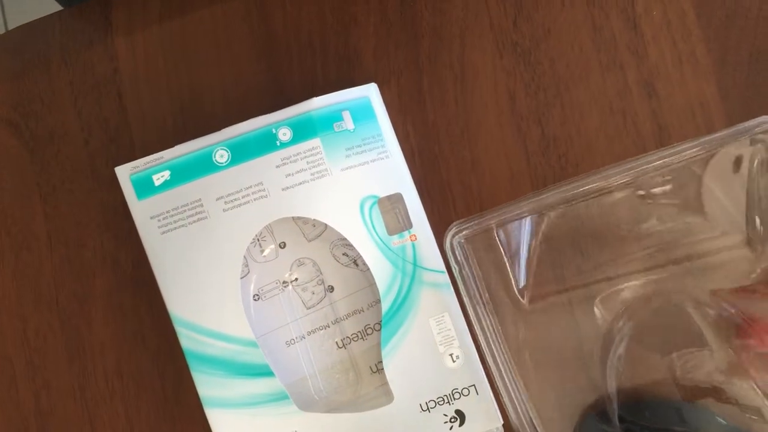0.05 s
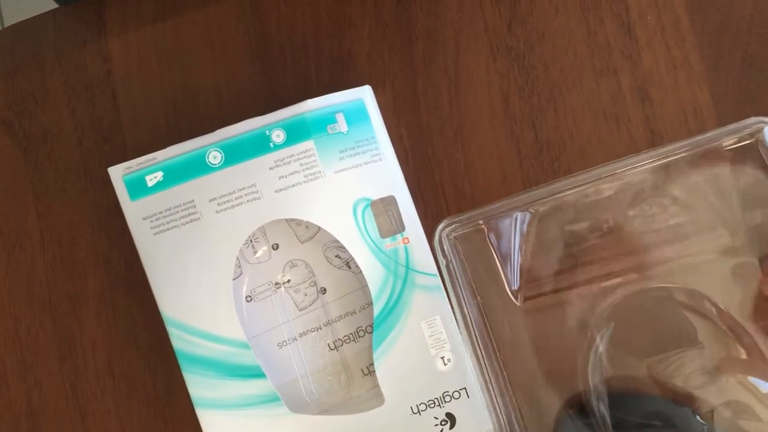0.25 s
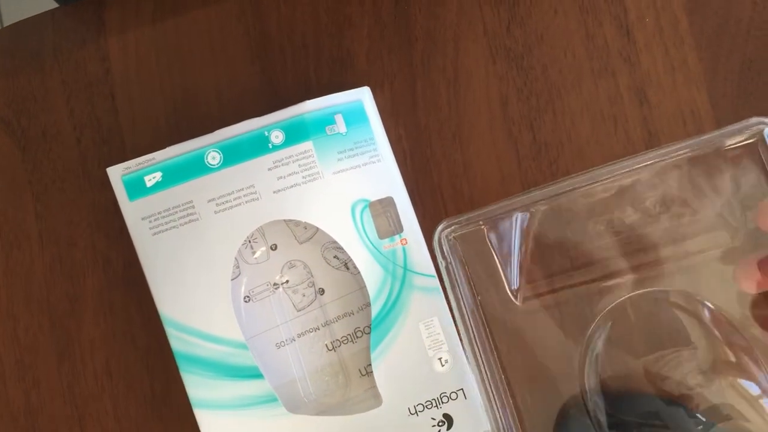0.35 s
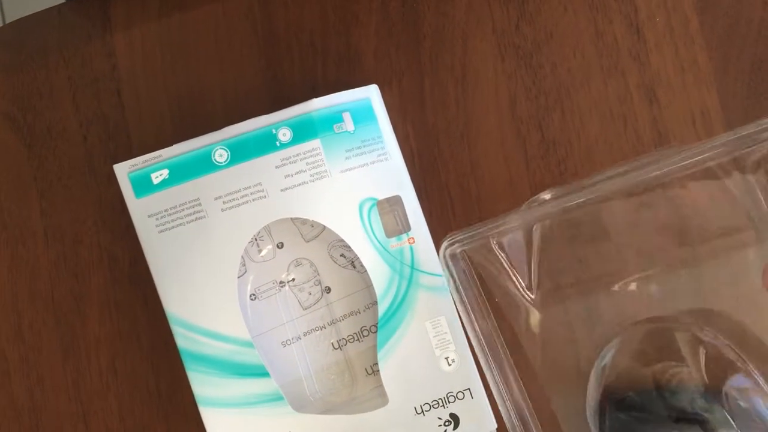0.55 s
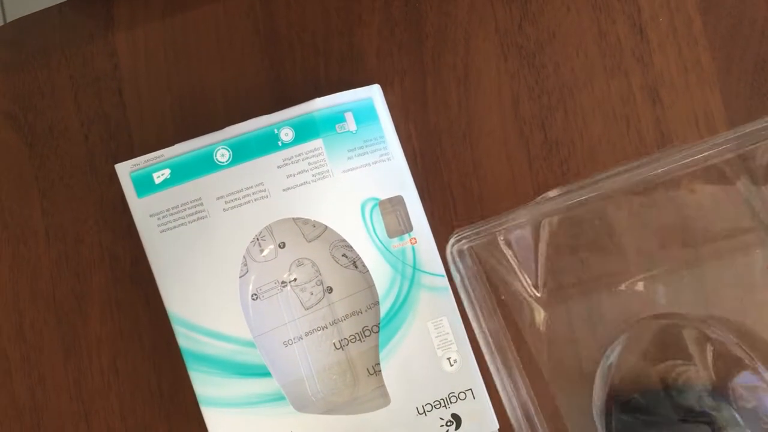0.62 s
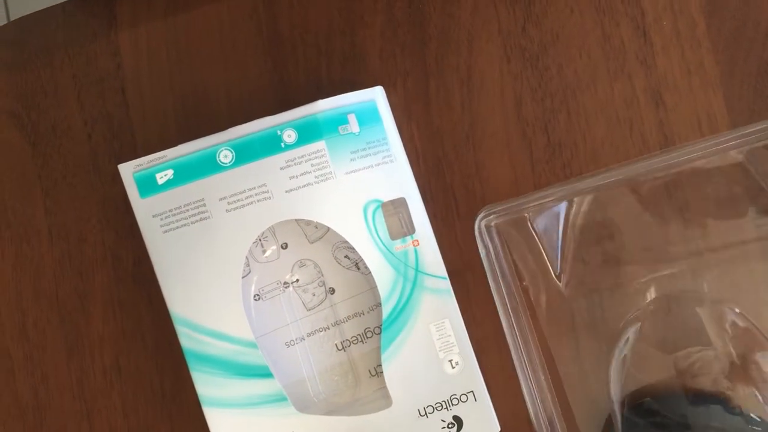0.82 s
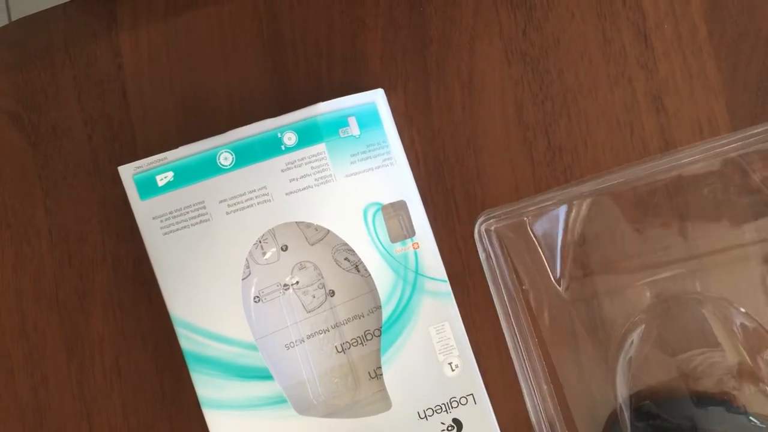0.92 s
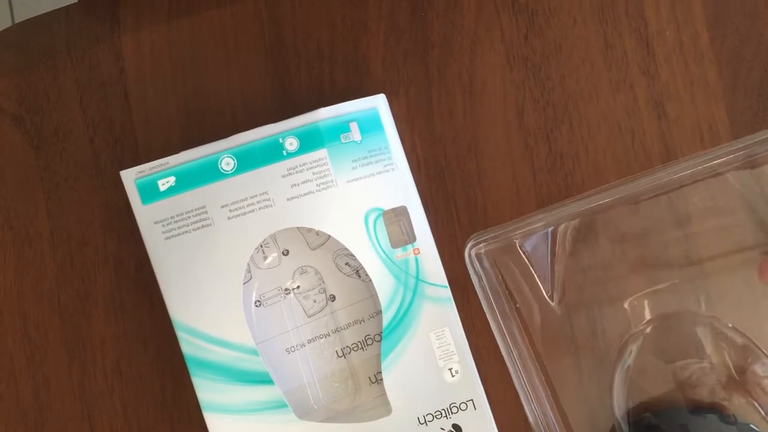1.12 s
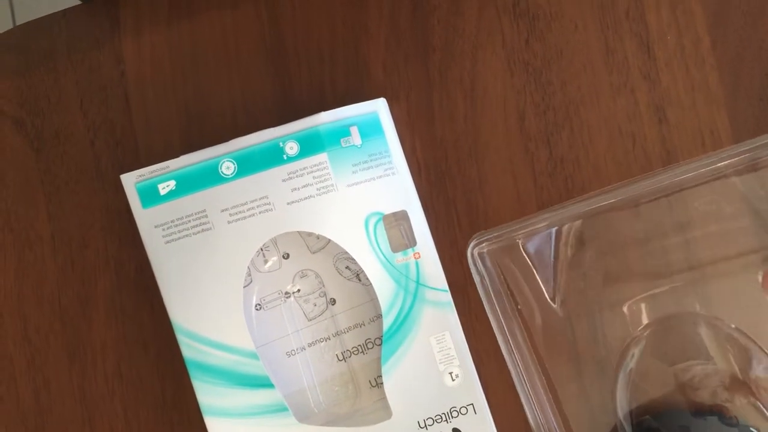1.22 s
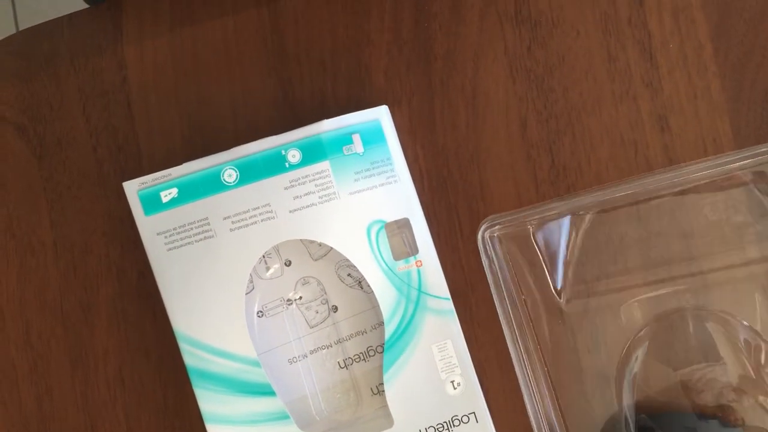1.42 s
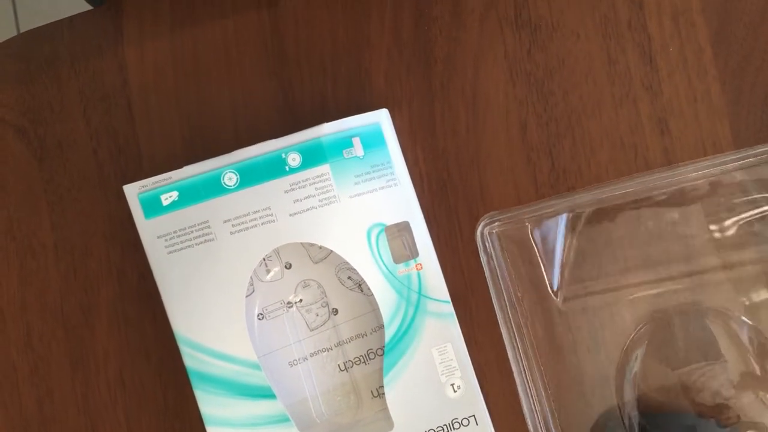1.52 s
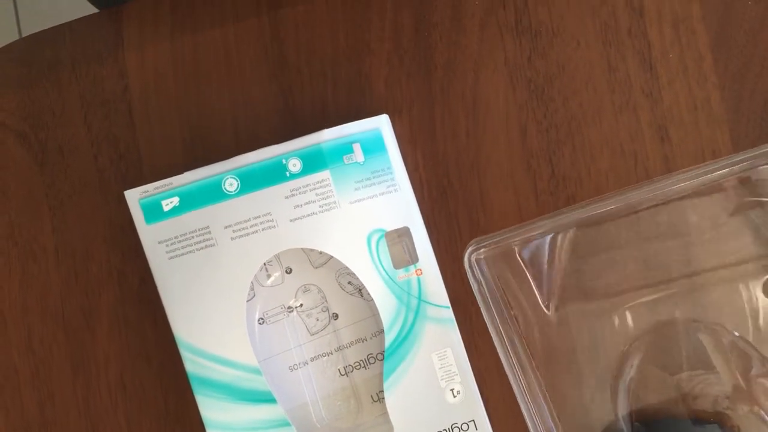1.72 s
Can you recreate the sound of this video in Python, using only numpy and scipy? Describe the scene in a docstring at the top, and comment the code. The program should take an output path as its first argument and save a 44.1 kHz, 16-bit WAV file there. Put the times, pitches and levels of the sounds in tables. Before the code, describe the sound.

Hard clear plastic packaging snaps and clacks loudly on a wooden table in a quiet room

```python
"""Sharp snaps of a clear plastic blister tray lifted and shifted on a wooden table in a small room.
Snaps: decaying noise bands, coloured by the buckling spot. Rim scrapes: dense random impulses.
Both pass through the shell resonances. Panel knocks and table bumps: damped sine modes.
Rim squeaks: narrow-band noise. Decaying-noise reverberation and a steady room tone lie behind."""
import sys
import numpy as np
from scipy import signal
from scipy.fft import rfft, irfft, next_fast_len
from scipy.io import wavfile

SR = 44100
rng = np.random.default_rng(int(sys.argv[2]) if len(sys.argv) > 2 else 0)


def output_pcm(signal):
    """Save a mono or channel-first signal as 16-bit PCM at the path in sys.argv[1].

    Samples are clipped to [-1, 1] before scaling.
    """
    pcm = np.clip(np.atleast_2d(signal).T, -1, 1) * 32767
    wavfile.write(sys.argv[1], SR, np.round(pcm).astype(np.int16))


N = 77175
T = np.arange(SR * 3 // 4) / SR  # time axis of one event, s
SIZE = next_fast_len(N + SR) // 2 * 2
HZ = np.fft.rfftfreq(SIZE, 1 / SR)

# Room tone spectrum, relative: freq_hz, level_db
ROOM_TONE_SPECTRUM = [(20, -38), (60, -4.5), (100, -4.5), (170, 3.5), (300, -15), (700, -6), (1200, -18.5),
                      (3000, -18.5), (6000, -27.5), (15000, -35.5)]
ROOM_TONE_DB = -64
# Reverberation decay: freq_hz, t60_s
ROOM_DECAY = [(100, 0.67), (170, 1), (350, 0.53), (700, 0.36), (2000, 0.39), (3500, 0.36), (6000, 0.27),
              (15000, 0.32)]
ROOM_DB, ROOM_RISE_S = -12.5, 0.0013

# Tabletop thuds: start_s, level_db, pitch_hz
BUMPS = [(0.229, -35, 168), (0.279, -36.5, 127.4), (0.333, -36, 66.6), (.365, -63, 54), (.522, -42, 74.6),
         (.815, -43, 65), (.876, -37.5, 97.4), (0.947, -44.5, 142.8), (1.13, -38.5, 123.3),
         (1.162, -37, 73), (1.554, -53, 63)]
# Tabletop modes: pitch_ratio, level_db
TABLE_MODES = [(.62, -20), (1, 0.5), (1.45, -6), (2.1, -5.5), (3.2, -19)]
BUMP_T60_S, BUMP_RISE_S = 0.17, 0.0079

# Panel knocks on the table: start_s, level_db, pitch_hz, t60_s
KNOCKS = [(.2245, -20.5, 682, 0.071), (.3362, -27, 717, 0.062), (0.3403, -22.5, 636, 0.041),
          (.6645, -14, 696, 0.021), (0.6662, -27.5, 362, 0.056), (.6810, -27, 720, 0.049),
          (.7060, -25, 667, 0.018), (0.8001, -34, 465, 0.068), (0.8765, -34.5, 374, 0.051),
          (.9160, -41.5, 631.5, 0.11), (1.0290, -45.5, 660, 0.068), (1.1301, -30.5, 534.7, 0.089),
          (1.5034, -44.5, 699, 0.12), (1.6080, -47.5, 648, 0.07), (1.6460, -42.5, 714, 0.093),
          (1.662, -44.5, 487, 0.061)]
# Panel modes: pitch_ratio, level_db
PANEL_MODES = [(0.519, -9.5), (0.758, -8.5), (1, 5.5), (1.229, -5), (1.75, -18.5)]
KNOCK_RISE_S = 0.0013
MODE_DETUNE = 0.0067  # standard deviation, fraction of pitch

# Rim squeaks: start_s, length_s, pitch_hz, level_db
SQUEAKS = [(0.069, .028, 1340, -43), (0.262, .03, 1636, -36.5), (.295, .05, 1613, -41.5)]
SQUEAK_HALF_WIDTH_HZ = 70

# Rim strokes: start_s, length_s, level_db, fade_db (drop over the stroke), treble_db
SCRAPES = [(0, 0.057, -34.5, 8.5, 0.5), (0.041, 0.18, -45, 16, -6), (0.238, 0.14, -42, 7.5, 4),
           (0.344, 0.21, -45, 15, -10.5), (0.517, 0.023, -59.5, 4, 11.5), (0.571, 0.065, -59, -4.5, 6.5),
           (.60, 0.066, -54, 6.5, 6), (0.675, 0.068, -54.5, -2, -0.5), (0.892, 0.061, -51, -1.5, 1.5),
           (0.954, 0.084, -59.5, -2.5, -16), (1.173, 0.043, -41, 12.5, 0.5), (1.39, 0.13, -59.5, 12, 14),
           (1.505, 0.11, -55, 9, 8), (1.592, 0.076, -51.5, 8, -26), (1.68, .07, -70.5, -2, 3)]
# Scrape spectrum, relative: freq_hz, level_db
SCRAPE_SPECTRUM = [(100, -2.5), (300, -4.5), (800, 1.5), (1400, -4), (2100, -5.5), (3500, -13),
                   (4800, -19.5), (7000, -26), (10000, -33), (15000, -34.5)]
SLIPS_PER_S, SLIP_SPREAD_DB, SCRAPE_EDGE_S = 3900, 1, 0.0013

# Tray shell resonances: freq_hz, width_hz, lift_db (before SHELL_TRIM_DB)
SHELL_RESONANCES = [(272, 120, -1.5), (532.8, 27.7, 11), (700.4, 65, 1.5), (802, 12, 10), (892, 19, 6),
                    (1027, 22, 5.5), (1187, 56, 2.5), (1550, 35, 7.5), (1664, 30, 6), (2003, 35, 3.5),
                    (2470, 54, 5.5), (2680, 20, -4), (3060, 17, 0.5), (3490, 93, 3.5)]
SHELL_TRIM_DB = -1.0

# Buckling snaps: start_s, level_db (before spot and shelves), bass_db, treble_db, t60_factor,
# spot_hz, spot_db (resonance of the buckling spot)
SNAPS = [(0.1998, -46.5, 10.5, 7, 2.2, 980, -4), (0.2148, -13.5, 0.5, 2, 0.81, 2750, 7.5),
         (.2172, -22, -1, 3, 1.1, 5400, 13.5), (.2215, -21.5, 4, 14.5, 0.36, 1190, 19),
         (.2245, -15, 5, 4, 0.82, 5400, 6), (.2268, -20, -1, -20, 0.77, 1320, 19),
         (.2314, -24.5, -13, 11.5, 0.5, 5740, 10.5), (.2450, -33.5, 17, 10, 1.3, 1500, -11),
         (0.2715, -39.5, -16, 15, 1.3, 14500, 15), (.4685, -45, -6, 10.5, 0.54, 3200, 11),
         (.6185, -43.5, 13.5, -6, 0.5, 2503, 8), (.6641, -23.5, 6.5, 2.5, 0.44, 6640, 16),
         (0.6651, -26.5, 4.5, -1, 0.82, 3360, 4.5), (.7982, -37.5, -13.5, 6.5, 1.6, 960, 17),
         (.8280, -53.5, 19, 4, 1.96, 3120, 10.5), (.8758, -50.5, 27.5, 1, 2.1, 860, -12),
         (.9115, -40.5, -6.5, 14.5, 0.72, 3600, 13), (.9150, -45.5, 13, -21, 2.7, 2780, 7),
         (.9365, -43.5, 7, -2, 0.44, 3710, 9), (.9420, -51.5, -8, -18, 0.62, 2750, 25),
         (.9475, -47, 2, -16, 0.56, 3600, 11), (.9890, -51, 5, -7, 0.73, 3780, 13),
         (1.0205, -65.5, -6.5, 13.5, 1.4, 2560, 18), (1.1290, -49.5, -1, 3.5, 0.91, 1763, 8),
         (1.1620, -45.5, 17.5, -6, 2.5, 2980, 11), (1.1726, -40.5, 4.5, -7, 1.12, 1065, 8.5),
         (1.1785, -41, -0.5, 9, 0.95, 4260, 4.5), (1.1870, -44.5, -3, 2, 1.6, 2850, -1),
         (1.3810, -54.5, 1, 10.5, 1.15, 2600, 11.5), (1.5026, -42.5, -29, 4, 0.31, 3485, 18),
         (1.5215, -49, -2.5, -22, 1.1, 3100, 14), (1.5557, -53.5, 14.5, 2, 0.45, 2480, 15.5),
         (1.5948, -40.5, -8, 9.5, .9, 2330, 7), (1.5975, -34.5, 0, 0.5, 0.62, 1820, 8)]
# Snap spectrum, relative: freq_hz, level_db
SNAP_SPECTRUM = [(40, -51), (100, -32.5), (170, -12), (270, -2.5), (420, -12.5), (700, 0.5), (1400, -2.5),
                 (2000, -5.5), (3000, -6), (4300, -12), (5600, -14.5), (7500, -18), (11000, -27.5),
                 (15000, -26)]
# Snap decay before t60_factor: freq_hz, t60_s
SNAP_DECAY = [(300, 0.062), (1000, 0.06), (3000, 0.053), (8000, 0.016), (15000, 0.033)]
SPOT_Q = 3.4

BASS_HZ, TREBLE_HZ = 940, 4440  # shelf corners
LOW_CUT_HZ, TOP_HZ = 35.4, 15250


def amp(db):
    """Decibels to gain."""
    return 10 ** (np.asarray(db) / 20)


def unit(x):
    """Scale to rms 1."""
    return x / np.sqrt(np.mean(x ** 2) + 1e-20)


def along(points, hz):
    """Interpolate (freq_hz, value) points on a log frequency axis."""
    freq_hz, value = np.transpose(points)
    return np.interp(np.log(hz + 1), np.log(freq_hz + 1), value)


def fade(t60_s):
    """Exponential decay, 60 dB in t60_s."""
    return np.exp(-np.log(1000) * T / max(t60_s, 1e-3))


def soft_start(rise_s):
    """Exponential approach to full level."""
    return 1 - np.exp(-T / rise_s)


def add(track, start_s, x):
    """Mix x into the track from start_s."""
    i = min(max(round(start_s * SR), 0), N)
    track[i:i + len(x)] += x[:N - i]


def colour(x, gain):
    """Minimum-phase filter with the given gain at each frequency."""
    cepstrum = irfft(np.log(np.maximum(gain, 1e-6)))
    cepstrum[1:SIZE // 2] *= 2
    cepstrum[SIZE // 2 + 1:] = 0
    response = np.exp(rfft(cepstrum))
    return irfft(rfft(x, SIZE) * response)[:len(x)]


def shelves(hz, bass_db, treble_db):
    """Gain of a bass shelf and a treble shelf."""
    bass = bass_db / (1 + (hz / BASS_HZ) ** 4)
    treble = treble_db * (1 - 1 / (1 + (hz / TREBLE_HZ) ** 4))
    return amp(bass + treble)


def dying_noise(decay, t60_factor=1, count=12):
    """Dense cloud of modes: noise bands, each with its own decay and an even start level."""
    edges_hz = np.r_[0, np.geomspace(250, SR / 2, count)]
    spectrum = rfft(rng.standard_normal(len(T)))
    hz = np.fft.rfftfreq(len(T), 1 / SR)
    out = np.zeros(len(T))
    for lo, hi in zip(edges_hz, edges_hz[1:]):
        env = fade(t60_factor * along(decay, (lo + hi) / 2))
        band = irfft(spectrum * ((hz >= lo) & (hz < hi)), len(T)) * env
        level = np.linalg.norm(env) * np.sqrt(2 * (hi - lo) / SR)
        out += band / np.linalg.norm(band) * level
    return out


def thump(modes, pitch_hz, t60_s, rise_s):
    """Damped sine modes, slightly detuned at random, with a soft start."""
    ring = np.zeros(len(T))
    for ratio, level_db in modes:
        mode_hz = pitch_hz * ratio * (1 + rng.normal(0, MODE_DETUNE))
        ring += amp(level_db) * np.sin(2 * np.pi * mode_hz * T)
    return ring * fade(t60_s) * soft_start(rise_s)


def room_tone():
    """Steady coloured noise of the quiet room."""
    noise = colour(rng.standard_normal(N), amp(along(ROOM_TONE_SPECTRUM, HZ)))
    return amp(ROOM_TONE_DB) * unit(noise)


def room(x, count=6):
    """Diffuse reverberation; equal stretches of time, each with its own random noise tail."""
    out = np.zeros(N)
    for part in np.array_split(np.arange(N), count):
        tail = dying_noise(ROOM_DECAY) * soft_start(ROOM_RISE_S)
        tail /= np.linalg.norm(tail)
        add(out, part[0] / SR, signal.fftconvolve(x[part], tail))
    return amp(ROOM_DB) * out


def bumps():
    """The tabletop's low modes answer the heavier contacts with a dull thud."""
    out = np.zeros(N)
    for start_s, level_db, pitch_hz in BUMPS:
        add(out, start_s, amp(level_db) * thump(TABLE_MODES, pitch_hz, BUMP_T60_S, BUMP_RISE_S))
    return out


def knocks():
    """A tray panel meets the table and its damped modes ring."""
    out = np.zeros(N)
    for start_s, level_db, pitch_hz, t60_s in KNOCKS:
        add(out, start_s, amp(level_db) * thump(PANEL_MODES, pitch_hz, t60_s, KNOCK_RISE_S))
    return out


def squeaks():
    """Stick-slip of the rim, a rough narrow pitch made as narrow-band noise."""
    out = np.zeros(N)
    for start_s, length_s, pitch_hz, level_db in SQUEAKS:
        gain = 1 / (1 + ((HZ - pitch_hz) / SQUEAK_HALF_WIDTH_HZ) ** 2)
        tone = colour(rng.standard_normal(len(T)), gain)
        n = int(length_s * SR)
        squeak = unit(tone[-n:]) * signal.windows.tukey(n, .5)  # skip the filter's onset
        add(out, start_s, amp(level_db) * squeak)
    return out


def scrapes():
    """The sliding rim makes a dense random run of tiny slips of uneven size."""
    out, n = np.zeros(N), len(T)
    base = unit(amp(along(SCRAPE_SPECTRUM, HZ)))
    for start_s, length_s, level_db, fade_db, treble_db in SCRAPES:
        edges = np.clip(np.minimum(T, length_s + SCRAPE_EDGE_S - T) / SCRAPE_EDGE_S, 0, 1)
        level = edges * amp(level_db - fade_db * np.minimum(T / length_s, 1))
        hits = rng.random(n) < SLIPS_PER_S / SR
        sizes = rng.standard_normal(n) * amp(SLIP_SPREAD_DB * rng.standard_normal(n))
        slips = unit(hits * sizes)
        add(out, start_s, colour(slips * level, base * shelves(HZ, 0, treble_db)))
    return out


def shell(x):
    """Snaps and scrapes ring the tray's resonances, applied as spectral peaks and dips."""
    lift_db = np.zeros(len(HZ))
    for freq_hz, width_hz, peak_db in SHELL_RESONANCES:
        lift_db += peak_db / (1 + (2 * (HZ - freq_hz) / width_hz) ** 2)
    return colour(x, amp(lift_db + SHELL_TRIM_DB))


def snaps():
    """Each buckling wall gives a short crack, coloured by the spot that gives way."""
    out = np.zeros(N)
    base = unit(amp(along(SNAP_SPECTRUM, HZ)))
    for start_s, level_db, bass_db, treble_db, t60_factor, spot_hz, spot_db in SNAPS:
        spot = amp(spot_db / (1 + (2 * SPOT_Q * (HZ / spot_hz - 1)) ** 2))
        gain = base * spot * shelves(HZ, bass_db, treble_db)
        crack = colour(dying_noise(SNAP_DECAY, t60_factor), gain)
        add(out, start_s, amp(level_db) * crack)
    return out


def scene():
    """Tray and table, direct and reverberant, over the room tone."""
    tray = shell(snaps() + scrapes()) + knocks() + bumps() + squeaks()
    return (tray + room(tray) + room_tone())[None]


def record(dry):
    """Roll off the deepest bass and cut steeply above TOP_HZ."""
    low_cut = 1 - 1 / (1 + (HZ / LOW_CUT_HZ) ** 4)
    top_cut = 1 / np.sqrt(1 + (HZ / TOP_HZ) ** 200)
    return irfft(rfft(dry, SIZE) * low_cut * top_cut, SIZE)[:, :N]


dry = scene()
out = record(dry)
output_pcm(out)
```